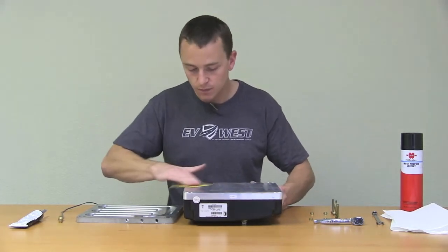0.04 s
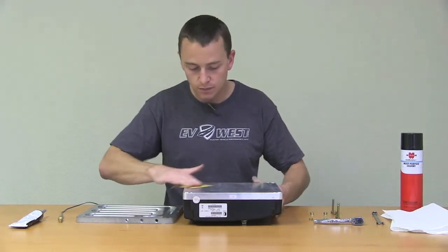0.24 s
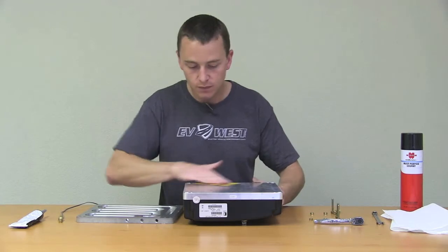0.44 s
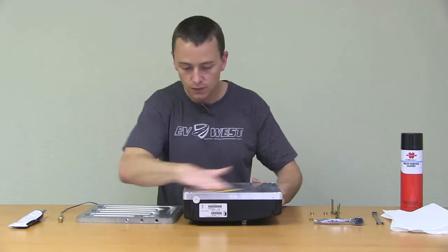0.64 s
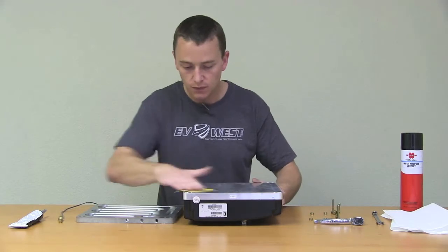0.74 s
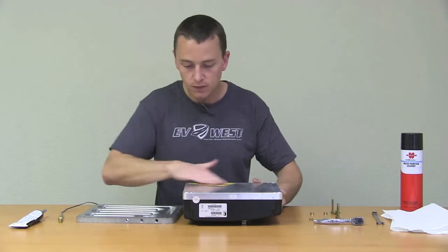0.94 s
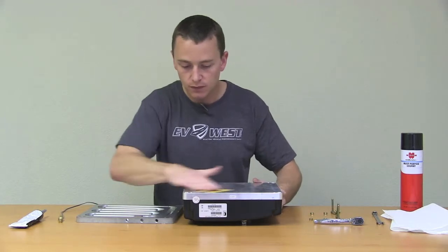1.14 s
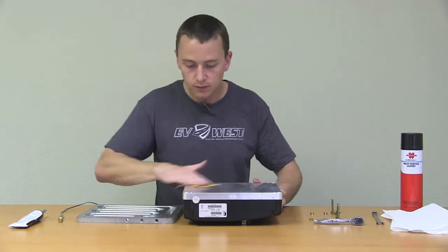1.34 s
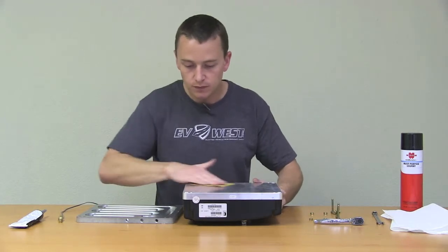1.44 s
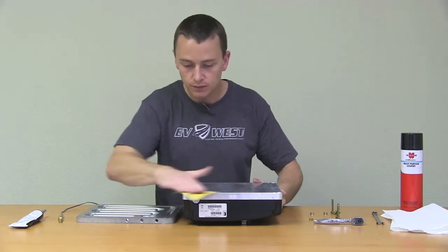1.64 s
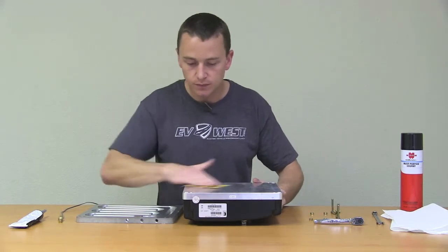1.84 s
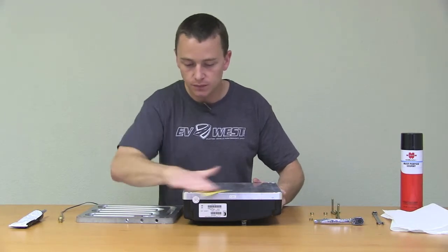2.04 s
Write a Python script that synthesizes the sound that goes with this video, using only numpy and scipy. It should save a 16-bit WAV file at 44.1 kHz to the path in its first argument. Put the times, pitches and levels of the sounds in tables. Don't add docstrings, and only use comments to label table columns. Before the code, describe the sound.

Sandpaper rubbed by hand over a metal plate, gritty strokes, with a small steel tool dropping and bouncing

```python
import sys
import numpy as np
from scipy import signal
from scipy.fft import rfft, irfft
from scipy.io import wavfile
from scipy.ndimage import uniform_filter1d

SR = 44100
rng = np.random.default_rng(int(sys.argv[2]) if len(sys.argv) > 2 else 0)


def ratio_of_db(decibels):
    return 10 ** (np.asarray(decibels, float) / 20)


def file_out(sig):
    cols = np.atleast_2d(sig).T
    lim = np.clip(cols, -1, 1)
    pcm = np.round(lim * 32767).astype(np.int16)
    wavfile.write(sys.argv[1], SR, pcm)


N = 92610


def colour(x, points):
    hz, db = np.array(points).T
    f = np.arange(N // 2 + 1) * SR / N + 1
    shape_db = np.interp(np.log(f), np.log(hz), db, left=-60, right=-70)
    y = irfft(rfft(x) * ratio_of_db(shape_db), N)
    return y / y.std()


def walk(rate):
    k = int(SR / rate)
    held = np.repeat(rng.standard_normal(N // k + 1), k)
    return 1.3 * uniform_filter1d(uniform_filter1d(held, k), k)[:N]


def add(out, s, x):
    i = int(s * SR)
    out[i:i + len(x)] += x[:N - i]


def ring(modes, gain):
    t = np.arange(SR // 2) / SR
    return sum(g * ratio_of_db(db - 60 * t / t60) * np.sin(2 * np.pi * hz * t)
               for (hz, db, t60), g in zip(modes, gain))


# f/Hz, level/dB per Hz
AIR_SPECTRUM = [(12, -24), (20, 3), (72, 4.5), (455, -11), (538, -3), (900, -13), (1670, -16), (2700, -11),
                (3200, -19), (6600, -26), (15000, -30)]
AIR_DB, AIR_FLICKER_DB = -62, 1.5


def room_air():
    level = ratio_of_db(AIR_DB + AIR_FLICKER_DB * walk(9.84))
    return level * colour(rng.standard_normal(N), AIR_SPECTRUM)


# f/Hz, level/dB per Hz
RUMBLE_SPECTRUM = [(20, 0), (93, -1), (300, -14), (980, -25), (2230, -45), (5000, -45), (9000, -36),
                   (14000, -45)]
RUMBLE_DB = -68.5


def mic_rumble(air):
    own = colour(rng.standard_normal(N), RUMBLE_SPECTRUM)
    return ratio_of_db(RUMBLE_DB) * (own + .5 * air / air.std())


ROOM_GAP_S = 0.0046


def room(x, t60, treble_t60):
    t = np.arange(SR) / SR
    noise = rng.standard_normal(SR) * ratio_of_db(1.8 * walk(400)[:SR])
    low = signal.sosfilt(signal.butter(2, 3500, fs=SR, output="sos"), noise)
    tail = low * ratio_of_db(-60 * t / t60) + (noise - low) * ratio_of_db(-60 * t / treble_t60)
    tail = tail * np.clip(t / ROOM_GAP_S - .5, 0, 1)
    return signal.fftconvolve(x, tail / np.sqrt(np.sum(tail ** 2)))[:N]


# t/s, length/s, centre f/Hz, level/dB
DRAGS = [
    (0, .03, 700, -57),
    (.035, .015, 1600, -53),
    (.05, .185, 750, -58),
    (1.2, .13, 300, -59),
    (1.78, .03, 260, -59),
]


def box_drags():
    out = np.zeros(N)
    for s, length, hz, db in DRAGS:
        shape = [(hz / 6, -16), (hz / 1.4, 0), (hz * 1.17, -3), (hz * 4, -20)]
        rustle = colour(rng.standard_normal(N), shape) * ratio_of_db(2 * walk(62))
        k = int(length * SR)
        add(out, s, ratio_of_db(db) * rustle[:k] * np.hanning(k) ** .5)
    return out


# t/s, peak level/dB, brightness/dB per octave
KNOCKS = [(.817, -50, -0.5), (.909, -51, 3), (.942, -54, -3), (1.031, -50, 0), (1.149, -54, 1),
          (1.236, -53, 0), (1.449, -57, -1), (1.524, -47, 2), (1.607, -59, 0), (1.695, -55, 2),
          (1.784, -53, -6), (1.893, -54, -2), (1.975, -57, 0), (2.068, -54, 0)]
# f/Hz, level/dB, t60/s
BOX_MODES = [(128.6, -24, 0.04), (231, -21, .035), (340, -8, 0.035), (466, -11.5, 0.037), (551, 5, 0.044),
             (673, 6.5, 0.038), (770, 0.5, 0.046), (868, 0, 0.028), (1100, -10, 0.018), (1304, 0.5, 0.039),
             (1600, -4, 0.035)]
BOX_DB, BOX_SCATTER_DB = -2.5, 3.5
BOX_DETUNE = .035
KNOCK_S = .004


def box_knocks():
    out, modes = np.zeros(N), np.array(BOX_MODES)
    octave = np.log2(modes[:, 0] / 600)
    soft = np.clip(np.arange(SR // 2) / SR / KNOCK_S, 0, 1)
    for s, db, bright_db in KNOCKS:
        z, detune = rng.standard_normal((2, len(modes)))
        struck = modes.copy()
        struck[:, 0] *= 1 + BOX_DETUNE * detune
        gain = ratio_of_db(BOX_SCATTER_DB * z + bright_db * octave)
        add(out, s - KNOCK_S / 2, ratio_of_db(db + BOX_DB) * soft * ring(struck, gain))
    return out


# t/s, level/dB
BOUNCES = [(0.2353, -12), (0.329, -14), (0.4025, -17.5), (0.4584, -22), (0.5171, -26), (0.5594, -30.5),
           (0.5919, -34.5), (0.615, -39.5), (.631, -38), (.643, -51), (0.649, -54)]
# f/Hz, level/dB, t60/s
TOOL_MODES = [(79, -29, 0.15), (149, -24.5, 0.037), (333, -23, 0.028), (684, -14, 0.02), (974, -8.5, 0.029),
              (1305, -10.5, 0.046), (1680, -14, 0.0065), (2235, -4, 0.038), (2988, 5.5, 0.025),
              (3500, -3, 0.017), (4150, 4, 0.01), (5000, 8.5, 0.0063), (5800, -2, 0.0037),
              (6400, -1.5, 0.016)]
TOOL_DB, CLICK_DB, CLICK_CUT_HZ = -11, 1.5, 3750
TABLE_ECHO_S, TABLE_ECHO_DB = .0028, 8
BURST_S, CHOKE_DB_PER_S = .0032, 9000


def tool_body():
    out, t = np.zeros(N), np.arange(SR // 2) / SR
    choke = np.maximum(ratio_of_db(-CHOKE_DB_PER_S * np.clip(t - BURST_S, 0, 1)), ratio_of_db(-9))
    swell = np.clip(t / TABLE_ECHO_S * 2, 0, 1) * choke
    bright = signal.butter(2, CLICK_CUT_HZ, "high", fs=SR)
    dull = signal.butter(2, 4300, fs=SR)
    for s, db in BOUNCES:
        z = rng.standard_normal(len(TOOL_MODES))
        signs = (-1) ** np.arange(len(z))
        blow = ratio_of_db(db + TOOL_DB) * ring(TOOL_MODES, ratio_of_db(z) * signs)
        add(out, s, ratio_of_db(CLICK_DB) * signal.lfilter(*bright, blow))
        add(out, s + TABLE_ECHO_S / 2, ratio_of_db(TABLE_ECHO_DB) * swell * signal.lfilter(*dull, blow))
    return out


# f/Hz, level/dB per Hz
CLACK_SPECTRUM = [(88, -45), (150, -19.5), (583, -4.5), (1070, -8), (1190, -3.5), (2430, -3.5),
                  (2670, -2.5), (8470, -20), (12000, -38), (15600, -62), (22000, -120)]
CLACK_S, CLACK_DB = .003, -14
TICK_S, TICK_DB = .004, -31


def tool_clack():
    clack, spikes = np.zeros((2, N))
    white = rng.standard_normal(N)
    noise, k = colour(white, CLACK_SPECTRUM), int(CLACK_S * SR)
    fade_db = -20 * np.arange(k * 4) / SR / TICK_S
    for s, db in BOUNCES:
        i = int(s * SR)
        burst = noise[i:i + k] * np.hanning(k) ** .5
        add(clack, s, ratio_of_db(db + CLACK_DB) * burst / burst.std())
        add(clack, s, ratio_of_db(db + TICK_DB + fade_db) * white[i:i + k * 4])
        add(spikes, s, ratio_of_db(db) * np.ones(1))
    return clack, colour(spikes, CLACK_SPECTRUM) * spikes.std()


RING_HZ, RING_DB, RING_T60_S = 8503, -33.5, .7


def tool_sing():
    sing = np.zeros(N)
    for s, db in BOUNCES:
        sing[int(s * SR):] = 0
        add(sing, s, ratio_of_db(db) * ring([(RING_HZ, RING_DB, RING_T60_S)], [1]))
    return sing


# t/s, length/s, start f/Hz, end f/Hz, level/dB
SQUEAKS = [(0.049, 0.031, 6550, 5910, -47.5), (0.063, 0.014, 3746, 4295, -46),
           (0.159, 0.041, 4400, 3930, -53), (0.902, 0.017, 5000, 4710, -46.5),
           (0.904, 0.047, 6020, 6670, -51), (1.06, 0.06, 3500, 3700, -57), (1.08, 0.075, 2620, 2320, -56),
           (1.067, 0.057, 7980, 8430, -49), (1.1, 0.0061, 6270, 6640, -46), (1.249, 0.21, 2450, 2750, -64),
           (1.559, 0.085, 2570, 2700, -66.5), (1.832, 0.064, 2606, 2494, -66),
           (0.734, .15, 2584, 2706, -67), (1.239, 0.038, 6000, 6300, -52), (1.476, 0.049, 1933, 3000, -62),
           (1.515, 0.055, 5950, 6360, -67), (1.521, 0.045, 3250, 4110, -53.5),
           (1.549, 0.048, 3700, 4330, -60.5), (1.679, 0.019, 2680, 3000, -55.5),
           (1.814, 0.016, 2534, 2750, -49.5), (1.944, 0.024, 2450, 2780, -58.5),
           (1.985, 0.024, 2700, 2780, -59.5)]
SQUEAK_Q, SQUEAK_ROUGH = 12, 1.05


def squeaks():
    out = np.zeros(N)
    for s, length, hz0, hz1, db in SQUEAKS:
        z = (rng.standard_normal((9000, 2)) @ [1, 1j])[:int(length * SR)]
        k = SQUEAK_Q * SR / hz0 / np.pi
        rough = 1 + SQUEAK_ROUGH * signal.lfilter([1], [1, -np.exp(-1 / k)], z) / np.sqrt(k)
        phase = 2 * np.pi * np.cumsum(np.linspace(hz0, hz1, len(z))) / SR
        tone = np.real(rough * np.exp(1j * phase))
        add(out, s, 2 * ratio_of_db(db) * np.hanning(len(z)) ** .5 * tone)
    return out


# t/s, peak level/dB, f/Hz
CRACKS = [(.0685, -32, 4200), (.184, -36, 6300), (.2275, -31, 2200), (.2302, -22, 3000), (.2318, -24, 3100),
          (.3175, -31, 5200), (.3176, -35, 8500), (.8935, -31, 7000), (.8947, -26, 7000),
          (1.099, -30, 7500), (1.106, -30, 7500), (1.12, -31, 6500), (.3205, -33, 3000), (.301, -32, 2100),
          (.392, -26, 5000), (.398, -28, 6500), (.4155, -30, 6500), (.444, -31, 6500), (1.3003, -33, 4500),
          (1.3006, -32, 7200), (1.312, -34, 8000), (1.33, -33, 4200), (1.3365, -33, 4300),
          (1.348, -32, 4300), (1.35, -32, 8500), (1.7755, -33, 8800), (1.787, -33, 5500),
          (1.336, -29, 7000), (1.506, -35, 6100), (.8095, -31, 9000), (1.728, -33, 5200),
          (1.7465, -31, 8500), (2.097, -35, 6000), (1.798, -35, 4500), (1.825, -32, 4500)]
CRACK_CYCLES = 3.7


def cracks():
    out, t = np.zeros(N), np.arange(300) / SR
    for s, db, hz in CRACKS:
        u = t * hz / CRACK_CYCLES
        swell = np.e * 2 * u * np.exp(-2 * u)
        add(out, s - .0005, ratio_of_db(db) * swell * np.sin(2 * np.pi * hz * t))
    return out


# t/s, level/dB, brightness/dB per octave
PRESSURE = [(0, -38.5, -3), (0.027, -50, -2.5), (.07, -44.5, -2.5), (0.12, -46, -1), (.142, -73, -11),
            (0.159, -49.5, 3), (0.221, -41.5, -7), (.6, -51.5, 2.5), (0.738, -48.5, 2.5),
            (0.751, -42.5, -3), (0.829, -42.5, -1.5), (.97, -54, -1), (1.03, -46.5, 0.5), (1.22, -50, -1.5),
            (1.45, -47.5, 3.5), (1.65, -46, -3.5), (1.88, -49.5, 0), (2.1, -47.5, -2)]
# t/s, rise/s, fall/s, extra level/dB (negative where the hand
# eases off), extra brightness/dB per octave
SHOVES = [(.305, 0.028, 0.018, -8, -7), (.92, 0.034, 0.013, 5, -1), (1.1, 0.048, 0.027, -1, 1),
          (1.267, 0.0044, 0.025, 4.5, 1), (1.312, 0.0045, .006, 2.5, 3.5), (1.34, 0.053, 0.025, 9.5, -2),
          (1.383, 0.0058, 0.017, 5, -4), (1.44, 0.034, 0.054, -0.5, -3), (1.665, 0.017, .012, -2.5, 2),
          (1.69, 0.0092, 0.012, 1, -2.5), (1.733, 0.0034, 0.004, 4.5, -1), (1.746, 0.0036, 0.0028, 10, 4),
          (1.784, 0.015, 0.033, 8, 1), (1.825, 0.009, 0.0082, 8.5, -3), (1.6, 0.012, 0.02, 0.5, 4.5)]
# f/Hz, level/dB per Hz
GRIT_SPECTRUM = [(590, -66.5), (1000, -17.5), (1650, -17), (2590, -7), (3340, -6), (4170, -3), (7880, 2.5),
                 (11400, -6.5), (16000, -23)]
GRAINS_PER_S, GRAIN_SPREAD_DB, FLICKER_DB = 22000, 1.3, 2.2


def scrape(t):
    when, level, brightness = np.array(PRESSURE).T
    db, tilt = np.interp(t, when, level), np.interp(t, when, brightness)
    for s, rise, fall, extra_db, extra_tilt in SHOVES:
        shove = np.exp(-((t - s) / np.where(t < s, rise, fall)) ** 2)
        db = db + extra_db * shove
        tilt = tilt + extra_tilt * shove
    hit = rng.random(N) < GRAINS_PER_S / SR
    size = ratio_of_db(GRAIN_SPREAD_DB * rng.exponential(size=N))
    grit = rfft(colour(hit * size * rng.standard_normal(N), GRIT_SPECTRUM))
    octave = np.log2((np.arange(len(grit)) * SR / N + 1) / 7000)
    out = np.zeros(N)
    for centre in np.arange(-12, 8) / 4:
        band = irfft(grit * np.clip(1 - 4 * abs(octave - centre), 0, 1), N)
        out += ratio_of_db(FLICKER_DB * walk(30.04) + tilt * centre) * band
    return out * ratio_of_db(db + 1.1 * walk(49.85))


ROOM_T60_S, ROOM_TREBLE_T60_S, ROOM_DB = 0.31, 0.28, 5.5
LATE_T60_S, LATE_DB = .9, -10.5
CLACK_ROOM_DB, STEEL_ROOM_DB, SCRAPE_ROOM_DB = 12, -18, -13
RING_SIDE_DB, STEEL_SIDE_DB = -16, -25


def scene():
    t = np.arange(N) / SR
    air = room_air()
    hand = box_drags() + box_knocks() + squeaks() + cracks() + scrape(t)
    contact, bare_clack = tool_clack()
    no_sub_bass = signal.butter(2, 50, "high", fs=SR, output="sos")
    steel, clack = signal.sosfilt(no_sub_bass, [tool_body() + contact, bare_clack])
    sing = tool_sing()

    far = ratio_of_db(CLACK_ROOM_DB) * clack + ratio_of_db(STEEL_ROOM_DB) * steel
    wet = ratio_of_db(ROOM_DB) * room(far, ROOM_T60_S, ROOM_TREBLE_T60_S)
    wet = wet + ratio_of_db(LATE_DB) * room(far, LATE_T60_S, .5 * LATE_T60_S)
    wet = wet + ratio_of_db(SCRAPE_ROOM_DB) * room(hand, ROOM_T60_S, ROOM_TREBLE_T60_S)

    low_echo = signal.lfilter(*signal.butter(3, 450, fs=SR), room(far, .3, .3))
    side = mic_rumble(air) + ratio_of_db(RING_SIDE_DB) * sing + ratio_of_db(STEEL_SIDE_DB) * low_echo
    return hand + steel + sing + wet + air + side * np.array([[1], [-1]])


def roll_off(x):
    return signal.sosfilt(signal.butter(12, 15800, fs=SR, output="sos"), x)


TOP_HZ = 15800


def record(dry):
    mix = signal.sosfilt(signal.ellip(10, .2, 80, TOP_HZ, fs=SR, output="sos"), dry)
    return roll_off(mix)


dry = scene()
out = record(dry)
file_out(out)
```